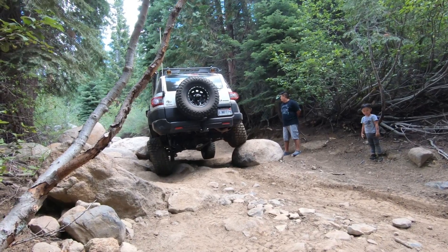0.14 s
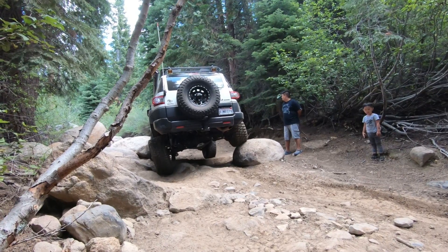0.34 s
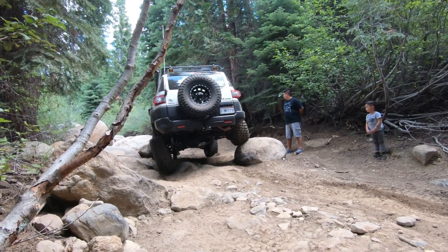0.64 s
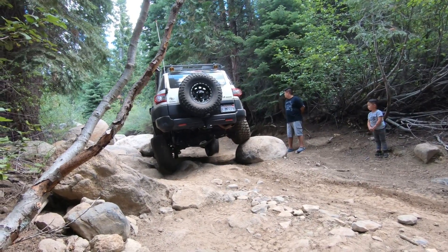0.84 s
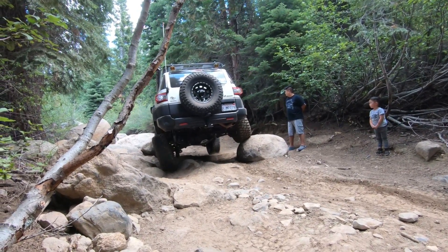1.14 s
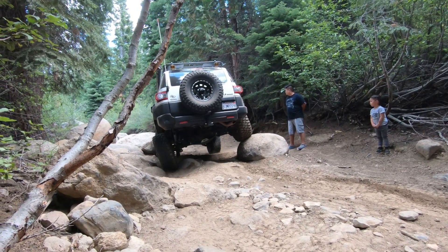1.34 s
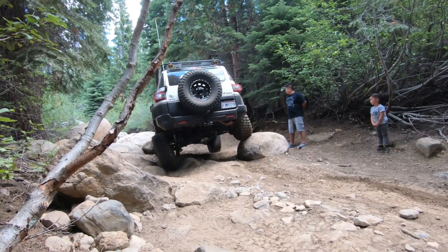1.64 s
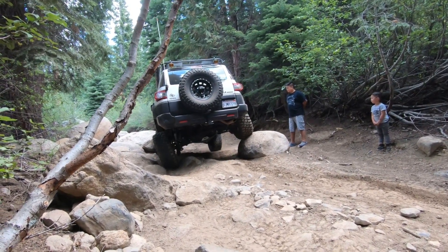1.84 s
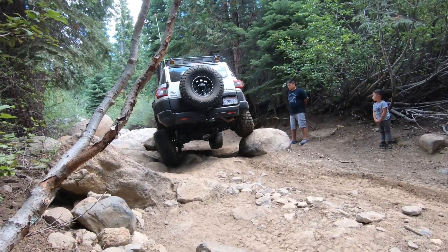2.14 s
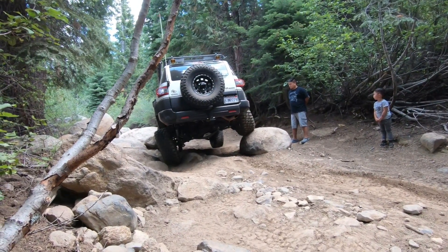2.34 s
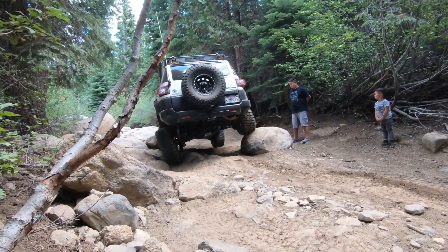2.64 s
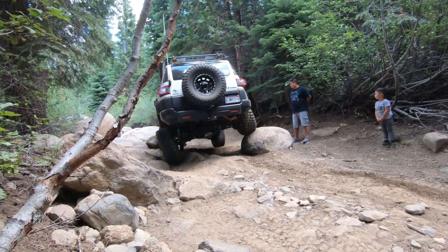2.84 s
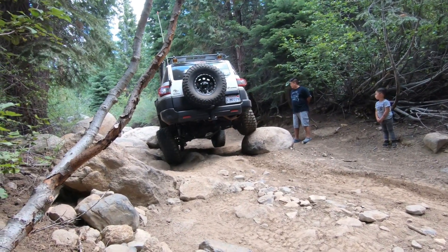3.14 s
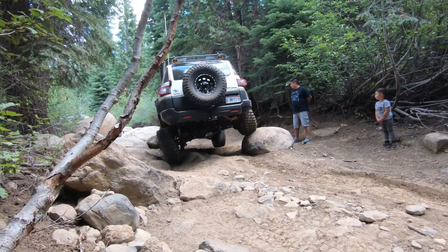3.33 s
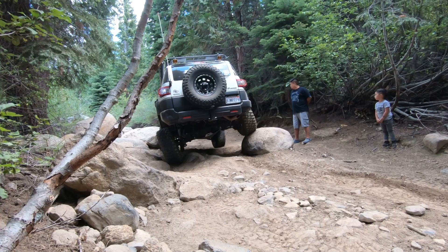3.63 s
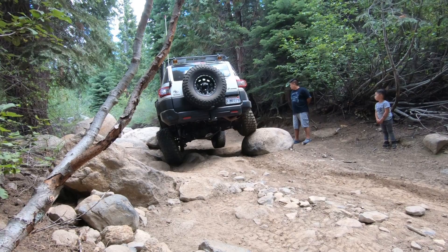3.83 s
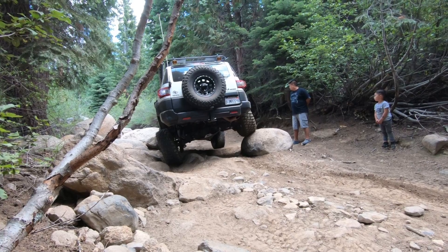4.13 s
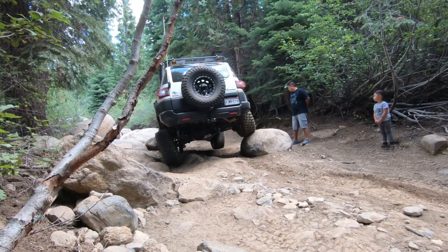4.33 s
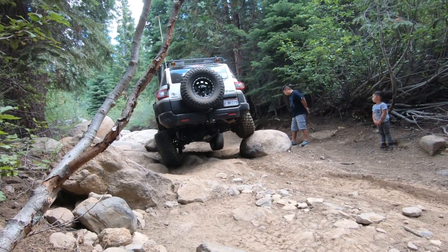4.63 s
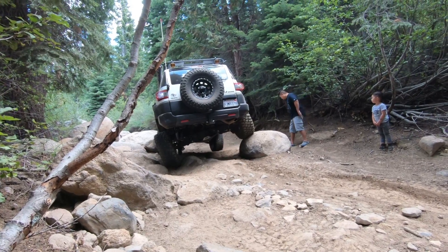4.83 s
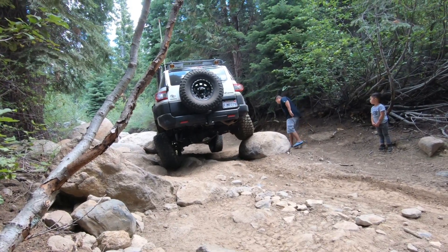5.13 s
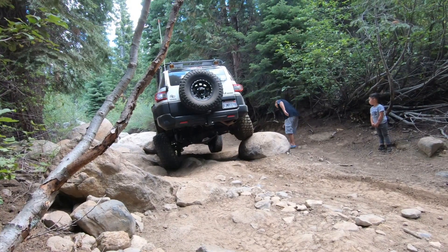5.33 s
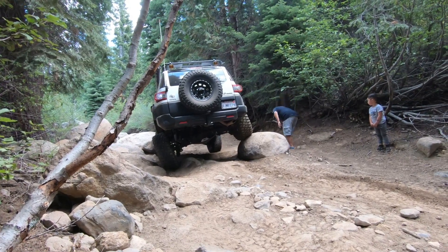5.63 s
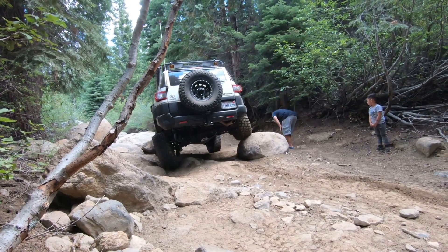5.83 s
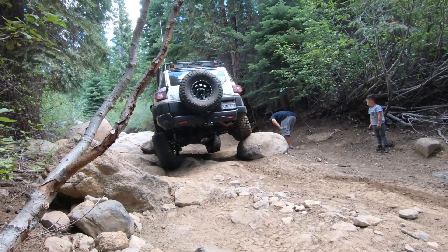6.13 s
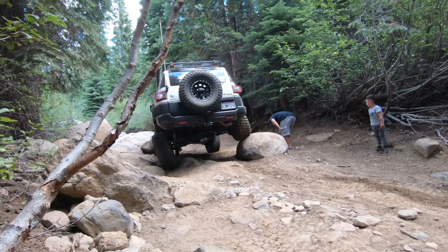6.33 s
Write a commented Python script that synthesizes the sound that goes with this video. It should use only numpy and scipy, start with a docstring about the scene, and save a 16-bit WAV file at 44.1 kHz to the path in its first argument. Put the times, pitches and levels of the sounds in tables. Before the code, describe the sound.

Outdoors on a forest trail, a six-cylinder truck is heard from some metres behind. At 0 s its exhaust throbs loud and deep, uneven pulses over a low body rumble, with airy fan and valve hiss. A tyre scrubs on rock in two grainy swells, peaking near 0.5 and 0.9 s, with dull stone knocks and tiny twig snaps around 0.4-0.9 s. Revs drop from 0.9 to 1.6 s, with a brief scrub and knock near 1.25 s. Low thuds fall at 1.8 and 2.5 s as the engine settles to a soft, lumpy near-idle with a faint thin whine. Light scuffs pass at 3.1-3.2 s; a sharp stony click comes at 3.8 s. Revs lift slightly around 4.4 s, ease, then climb from 5.1 s to the end at 6.5 s, growing louder, with rushing air and a faint last scrub. Stereo, slight tree scatter, very faint microphone hiss.

```python
"""Throb of a six-cylinder truck crawling over a boulder in a forest, from behind at some metres.
Two banks fire in turn into a resonant exhaust; revs fall to near idle and pick up again.
A tyre scrubs on rock as shaped, grainy noise; stones knock, twigs snap and two scuffs pass as bursts.
Shaped noise makes the rumble, the engine bay's hiss, rush and whine, and the microphone's faint hiss."""
import sys
import numpy as np
from scipy import signal
from scipy.fft import rfft, irfft, next_fast_len
from scipy.io import wavfile

SR = 44100
rng = np.random.default_rng(int(sys.argv[2]) if len(sys.argv) > 2 else 0)


def dump(signal):
    """Clip the signal to [-1, 1] and save it as 16-bit WAV at the path in sys.argv[1]."""
    limited = np.clip(np.atleast_2d(signal).T, -1, 1)
    pcm = np.round(limited * 32767).astype(np.int16)
    wavfile.write(sys.argv[1], SR, pcm)


N = 285306
SIZE = next_fast_len(N + SR // 2)   # FFT length


def from_db(db):
    """Decibels to gain."""
    return 10 ** (np.asarray(db) / 20)


def rms_one(x):
    """Scale to unit rms."""
    return x / np.sqrt(np.mean(x ** 2) + 1e-20)


def in_time(rows):
    """Interpolate a (seconds, value) table to every sample."""
    s, value = np.transpose(rows)
    return np.interp(np.arange(N) / SR, s, value)


def at_hz(points):
    """Interpolate a (Hz, value) table to every FFT bin, along log frequency."""
    bin_hz = np.maximum(np.arange(SIZE // 2 + 1) * SR / SIZE, 1)
    table_hz, value = np.transpose(points)
    return np.interp(np.log(bin_hz), np.log(table_hz), value)


def drift(rate_hz):
    """Random wander: normal knots of spread 1, rate_hz a second, joined by straight lines."""
    knots = rng.standard_normal(N // 100 + 2)
    return np.interp(np.arange(N) * rate_hz / SR, np.arange(len(knots)), knots)


def noise():
    """Three white noises: the direct sound and what trees and rocks scatter to each port."""
    return rng.standard_normal((3, N))


def coloured(x, tone):
    """Filter x by a (Hz, dB) curve, then scale to rms 1."""
    spectrum = rfft(x, SIZE) * from_db(at_hz(tone))
    return rms_one(irfft(spectrum, SIZE)[..., :N])


def resonance(x, hz, width_hz):
    """Two-pole band-pass, gain near 1 at its centre."""
    r = np.exp(-np.pi * width_hz / SR)
    b = [(1 - r * r) / 2, 0, (r * r - 1) / 2]
    a = [1, -2 * r * np.cos(2 * np.pi * hz / SR), r * r]
    return signal.lfilter(b, a, x)


def resonance_twice(x, hz, width_hz):
    """Two resonances in series, the second twice as wide."""
    return resonance(resonance(x, hz, width_hz), hz, 2 * width_hz)


def butter(x, order, hz, kind):
    """Butterworth filter, kind "low" or "high"."""
    return signal.sosfilt(signal.butter(order, hz, kind, fs=SR, output="sos"), x)


def exhaust(load_db, swing_db):
    """One gas pulse per firing, banks in turn, each a little unlike the last, ringing in the pipe."""
    # Engine speed. Each row: time in seconds, firings per second of one bank.
    revs = [(0.0, 31.2), (0.32, 32.4), (0.65, 31.3), (0.9, 29.8), (1.24, 23.5), (1.6, 20.2), (1.75, 20.3),
            (2.7, 18.3), (4.0, 18.3), (4.34, 19.4), (4.5, 19.7), (5.1, 18.7), (5.49, 24.0), (5.6, 25.3),
            (5.71, 26.1), (5.98, 27.1), (6.14, 29.0), (6.47, 30.5)]
    # Bank with the longer way to the tail pipe. Each row: firings per second of one bank,
    # pulse size relative to the other bank (0-1).
    far_bank = [(19, .15), (24, .25), (31, .32)]
    # Pipe resonances. Each row: centre in Hz, width in Hz, relative level in dB.
    pipe_modes = [(66.96, 10, -16.5), (93.8, 14, -10.5), (130, 7.7, 6.5), (146.3, 25.3, -7.5),
                  (186.7, 12, -11.5), (244.2, 28, -22)]
    scatter_db = .9   # firing-to-firing spread
    boom_db, boom_follows = -37, 1.52   # level at mean load, share of the load's swing

    bank_hz = in_time(revs)
    firings = np.cumsum(2 * bank_hz) / SR + 0.2823
    at = np.flatnonzero(np.diff(np.floor(firings)))
    far_share = np.interp(bank_hz[at], *np.transpose(far_bank))
    bank = np.where(np.arange(len(at)) % 2, far_share, 1)
    pulses = np.zeros(N) + 1e-18
    pulses[at] = bank * from_db(scatter_db * rng.standard_normal(len(at)))

    pipe = np.zeros(N)
    for k, (hz, width_hz, db) in enumerate(pipe_modes):
        pipe += (-1) ** k * from_db(db) * resonance(pulses, hz, width_hz)
    pipe = butter(pipe, 6, 268, "low")   # the silencer
    pipe = butter(pipe, 4, 46, "high")

    boom_level = from_db(boom_db + boom_follows * swing_db + drift(3.7))
    boom = np.sqrt(2) * np.sin(2 * np.pi * firings) * boom_level
    boom = butter(boom, 4, 48, "high")   # the deepest notes hardly radiate
    return rms_one(pipe) * from_db(load_db) + boom


def rumble(swing_db):
    """Lumpy low noise from body, drive line and ground follows the load; a panel drones steadily."""
    # Each row: frequency in Hz, relative level in dB per Hz.
    tone = [(8, -32.5), (22, -20), (35, -18), (60, -1), (90, -4), (130, -9), (200, -9), (260, -11),
            (310, -24), (420, -27), (520, -40), (1400, -87)]
    rumble_db, follows = -38, 0.38   # level at mean load, share of the load's swing
    drone_hz, drone_width_hz, drone_db = 60, 5, -43   # a body panel hums along
    lumps = coloured(noise(), tone) * from_db(rumble_db + follows * swing_db + 0.47 * drift(9))
    drone = rms_one(resonance_twice(noise(), drone_hz, drone_width_hz))
    return lumps + from_db(drone_db) * drone


def scrub():
    """Rubber slips on stone: dense uneven grains, swelling with each slip and dying on grip."""
    # Each row: slip start in seconds, full level in seconds, grip regained in seconds, level in dB.
    slips = [(0.0, .42, 0.57, -40), (0.546, .8, 0.96, -40), (1.174, 1.24, 1.277, -45),
             (5.95, 6.4, 6.5, -48)]
    # Each row: frequency in Hz, relative level in dB per Hz.
    tone = [(160, -35.5), (280, -2), (330, -1), (417, -11.5), (666, -12), (853, -21.5), (1080, -16.5),
            (1740, -26), (5030, -45), (6360, -42.5), (7500, -46), (9750, -78), (16500, -120)]
    grip_db_per_s, grains_per_s = 81, 4000
    t = np.arange(N) / SR
    level = np.zeros(N)
    for start, full, grip, db in slips:
        rise = np.clip((t - start) / (full - start), 0, 1)
        level += rise * from_db(db - grip_db_per_s * np.maximum(t - grip, 0))
    grains = (rng.random(N) < grains_per_s / SR) * from_db(2.8 * rng.exponential(1, N))
    slip = noise() * (rms_one(grains) + 1.1)
    return coloured(slip, tone) * level * from_db(1.5 * drift(45))


def engine_bay(swing_db):
    """Fan and valve hiss, air rushing under throttle, and a faint whine of narrow noise."""
    # Each row: frequency in Hz, relative level in dB per Hz.
    hiss_tone, rush_tone = [(240, -29.5), (400, -6.5), (573, -10), (810, -9.5), (1080, -11.5), (1170, -8),
                            (1280, -12.5), (1520, -9), (2100, -15), (3090, -16), (5070, -22), (6250, -17.5),
                            (7720, -29.5), (10000, -64.5), (17000, -120)], [(1500, -61), (2500, -9.5), (3000, -10), (3300, -8),
                                               (3700, -11.5), (4300, -11.5), (6500, -58)]
    # Levels. Each row: time in seconds, level in dB.
    rush_db, whine_db = in_time([(0, -53), (.3, -61.5), (1.0, -66.5), (2.6, -71), (3.0, -67), (3.3, -74),
                                 (5.15, -69), (5.4, -64), (5.6, -67.5), (6.05, -64.5), (6.2, -57.5),
                                 (6.47, -57)]), in_time([(0, -68.5), (.9, -60.5), (1.6, -74), (2.05, -65.5),
                                                        (4.1, -65), (5.0, -73.5), (6.0, -66.5), (6.47, -76)])
    hiss_db, follows, flicker_db = -58.5, .08, .6   # at mean load, share of the load's swing, wander
    whine_hz, whine_width_hz = 1192, 55
    hiss_level = from_db(hiss_db + follows * swing_db + flicker_db * drift(26))
    hiss = coloured(noise(), hiss_tone) * hiss_level
    rush = coloured(noise(), rush_tone) * from_db(rush_db + drift(28))
    whine = rms_one(resonance_twice(noise(), whine_hz, whine_width_hz))
    return hiss + rush + whine * from_db(whine_db + drift(34))


def knocks():
    """Stones shift under the tyres: a dull narrow thud that swells for a moment and dies."""
    # Each row: start in seconds, level before the envelope in dB, centre in Hz.
    stones = [(0.434, -38, 1074), (0.421, -29.5, 328), (.5065, -38, 1280), (1.261, -31, 292),
              (1.783, -26.5, 67.2), (2.496, -31, 60.2), (3.799, -46, 965), (3.814, -45.5, 1730)]
    decay_cycles = 44   # cycles to die by 60 dB
    out, t = np.zeros((3, N)), np.arange(SR // 2) / SR
    for s, db, hz in stones:
        thud = rms_one(resonance_twice(rng.standard_normal((3, len(t))), hz, .3 * hz))
        i, age = round(s * SR), t * hz / decay_cycles
        out[:, i:i + len(t)] += thud * (1 - np.exp(-30 * age)) * from_db(db - 60 * age)
    return out


def snaps_and_scuffs():
    """Twigs and grit snap, and two longer scuffs: broad bursts, each with a faint tail from the trees."""
    # Each row: start in seconds, starting level before the low-pass in dB, centre in Hz,
    # time to die by 60 dB in seconds. The two slowest to die are the scuffs.
    bursts = [(0.367, -49, 5500, .012), (0.4333, -47.5, 3800, .012), (0.4434, -50.5, 5000, .01),
              (0.481, -50, 5500, .015), (.507, -52.5, 5500, .012), (0.517, -50, 4700, .015),
              (.684, -52.5, 3500, .015), (.8665, -53, 5600, .02), (0.8994, -49, 6500, .015),
              (3.124, -56.5, 2270, .25), (3.235, -55.5, 1500, 0.1), (3.802, -46, 4700, .035),
              (3.8136, -44, 4440, .04)]
    tail_t60_s, tail_db = 0.53, -16   # tail level relative to the burst
    out, t = np.zeros((3, N)), np.arange(SR // 6) / SR
    for s, db, hz, t60_s in bursts:
        burst = rms_one(resonance(rng.standard_normal((3, len(t))), hz, .8 * hz))
        i = round(s * SR)
        body = from_db(db - 60 * t / t60_s)
        tail = from_db(db + tail_db - 60 * t / tail_t60_s)
        out[:, i:i + len(t)] += burst * (body + tail)
    return signal.sosfilt(signal.cheby2(6, 21.0, 8000, fs=SR, output="sos"), out)


def mic_hiss():
    """Faint steady self-noise of the microphone in the top octave."""
    # Each row: frequency in Hz, relative level in dB per Hz.
    tone = [(6000, -31), (8200, -5.5), (10000, -5.5), (12500, -14.5), (14500, -19.5)]
    level_db = -85.5
    return from_db(level_db) * coloured(noise(), tone)


def ports(x, side):
    """Two microphone ports share the first channel, and each adds its own; phase and level differ."""
    # Each row: frequency in Hz, direct share of the power (0-1).
    likeness = [(40, .75), (70, .8), (120, .95), (240, .93), (500, .8), (1000, .77), (2000, .82),
                (4000, .58), (8000, .4)]
    # Each row: frequency in Hz, phase by which left leads in radians.
    lead = [(100, 0), (430, -.3), (860, 1.9), (1120, 1.1), (1900, 1.0), (2150, 1.2), (2580, -.1),
            (3200, .4), (7400, -.3)]
    direct, *scattered = rfft(x, SIZE)
    alike = np.clip(at_hz(likeness), 0, 1)
    tilt = (at_hz(side) * np.log(10) / 20 + 1j * at_hz(lead)) / 2   # half to each port
    mixed = np.sqrt(alike) * direct + np.sqrt(1 - alike) * np.array(scattered)
    return irfft(mixed * np.exp([tilt, -tilt]), SIZE)[:, :N]


def scene():
    """Truck ahead, the working tyre to one side; the deep exhaust note arrives unscattered."""
    # Engine load as level of the exhaust pipe. Each row: time in seconds, level in dB.
    load_db = in_time([(0, -17.5), (.3, -23.5), (.8, -20.5), (1.2, -23), (1.47, -26), (1.62, -28),
                       (2.3, -29), (3.0, -30.5), (3.9, -30), (4.2, -27.5), (4.7, -29.5), (5.15, -28),
                       (5.4, -21.5), (5.8, -18.5), (6.47, -19)])
    # Each row: frequency in Hz, left minus right in dB.
    truck_side, tyre_side = [(60, -0.9), (130, -1.1), (300, -4.5), (660, -3.5), (1470, -4), (2500, 0.5),
                             (4300, -2)], [(170, -2), (510, -5), (860, -7.5), (1470, 4.5),
                                                 (4300, 0.5)]
    swing_db = load_db - load_db.mean()
    truck = rumble(swing_db) + engine_bay(swing_db) + snaps_and_scuffs() + mic_hiss()
    truck[0] += exhaust(load_db, swing_db)   # direct channel only
    tyre = scrub() + knocks()
    return ports(truck, truck_side) + ports(tyre, tyre_side)


def record(dry):
    """Steep low-pass: 60 dB down from 14.2 kHz up."""
    cutoff_hz = 14200
    return signal.sosfilt(signal.cheby2(12, 60, cutoff_hz, fs=SR, output="sos"), dry)


dry = scene()
out = record(dry)
dump(out)
```